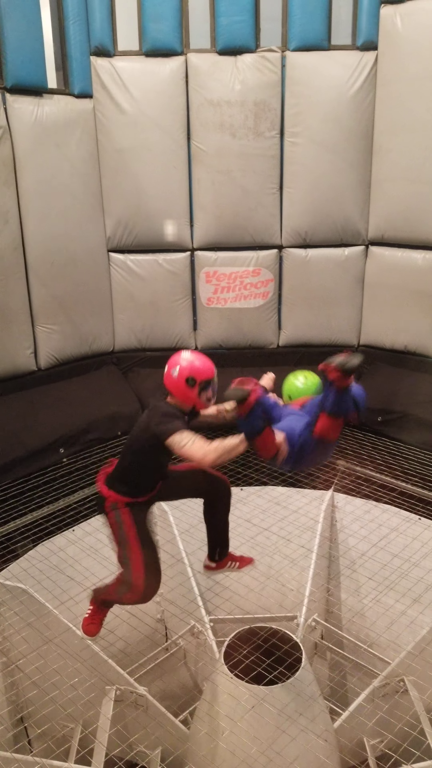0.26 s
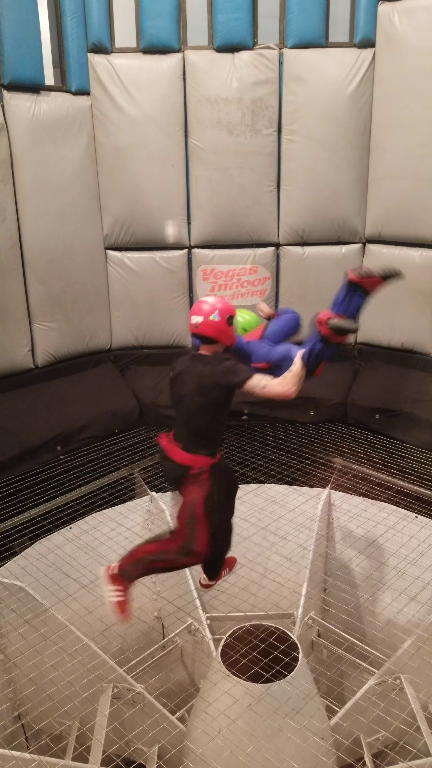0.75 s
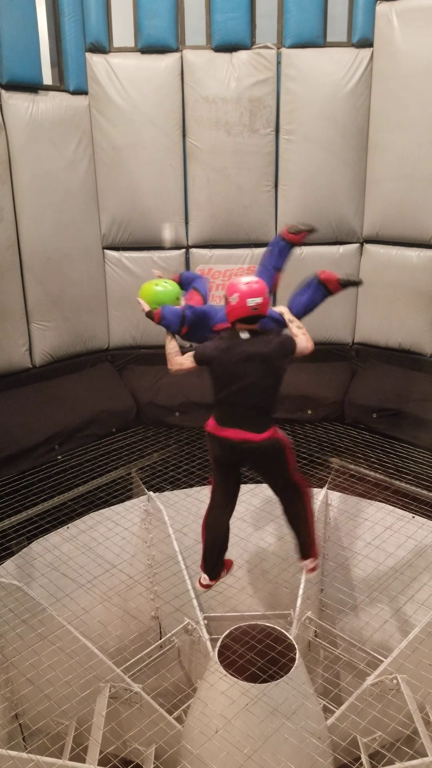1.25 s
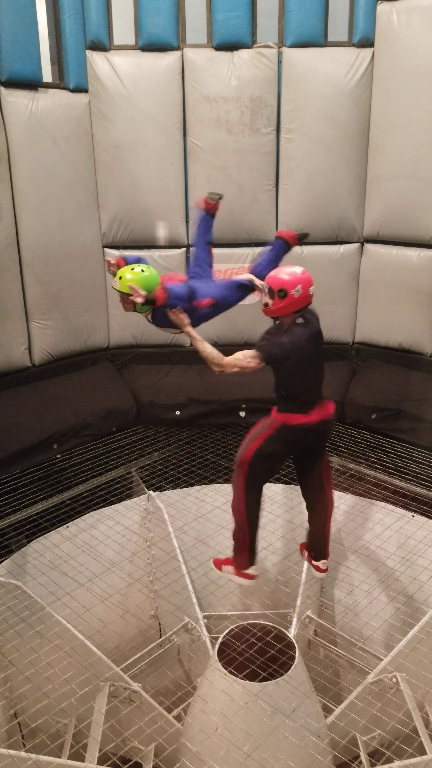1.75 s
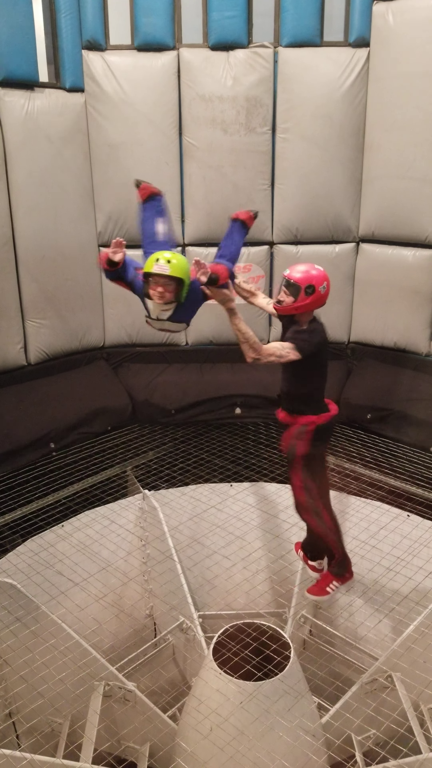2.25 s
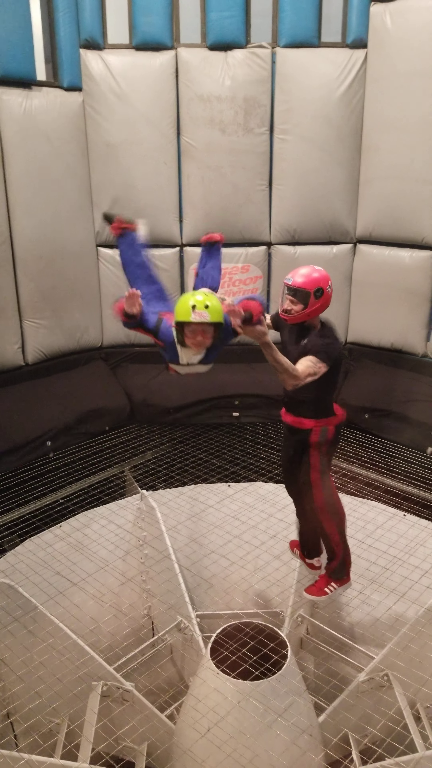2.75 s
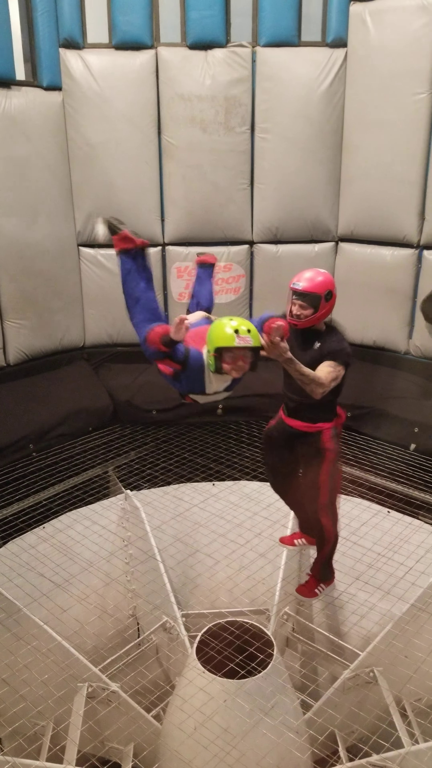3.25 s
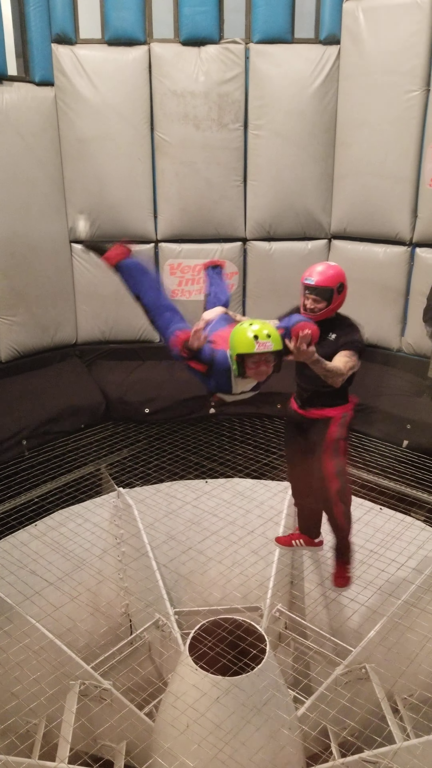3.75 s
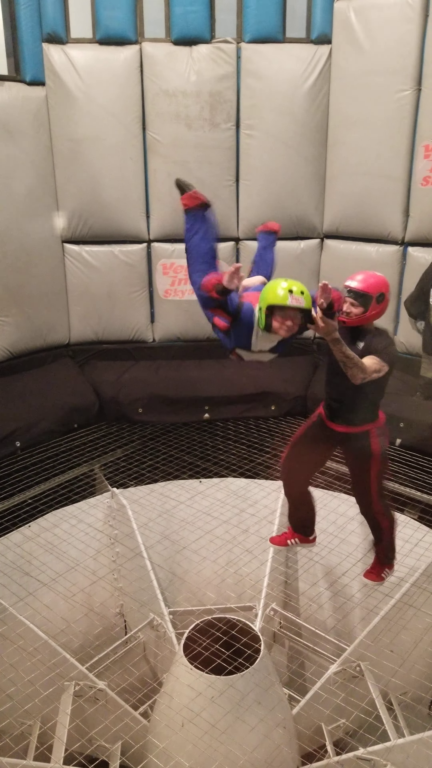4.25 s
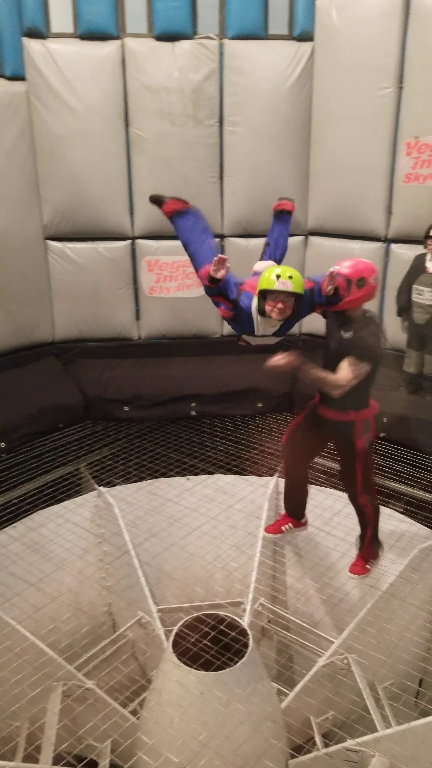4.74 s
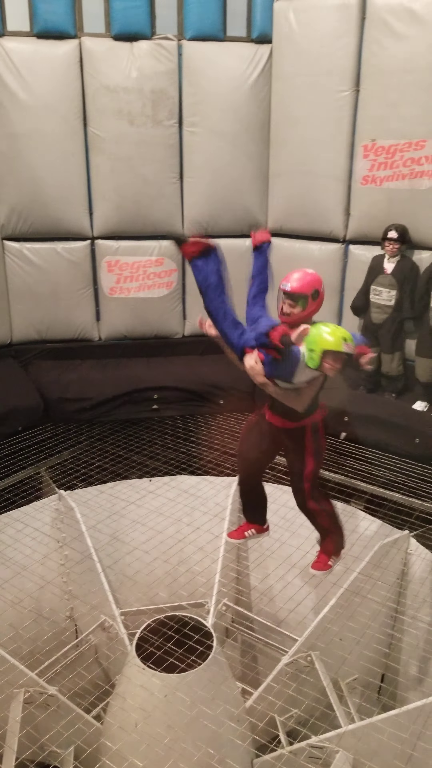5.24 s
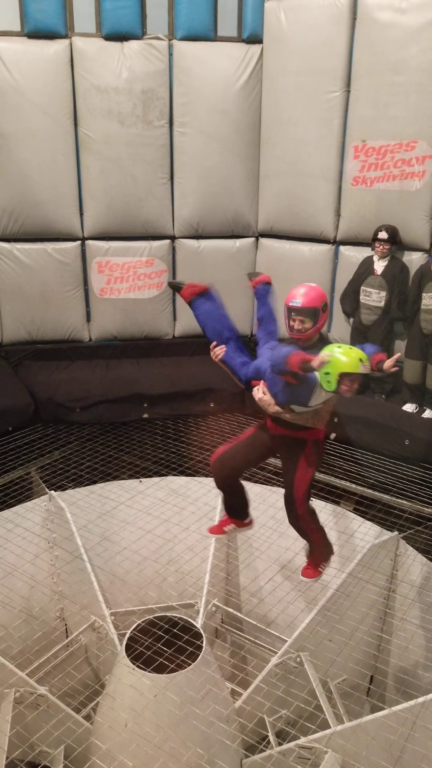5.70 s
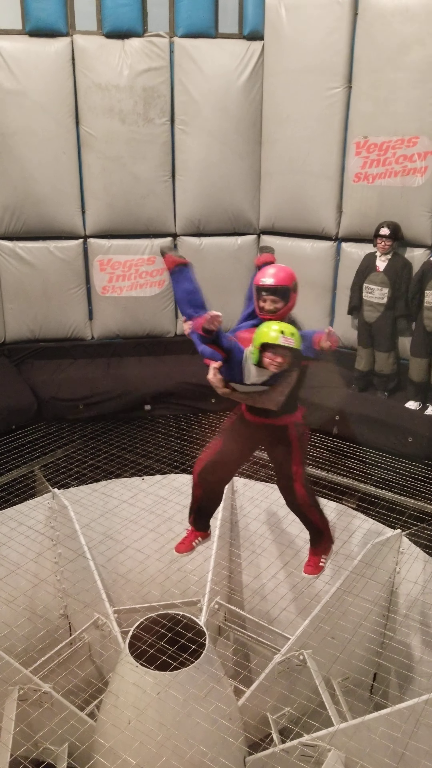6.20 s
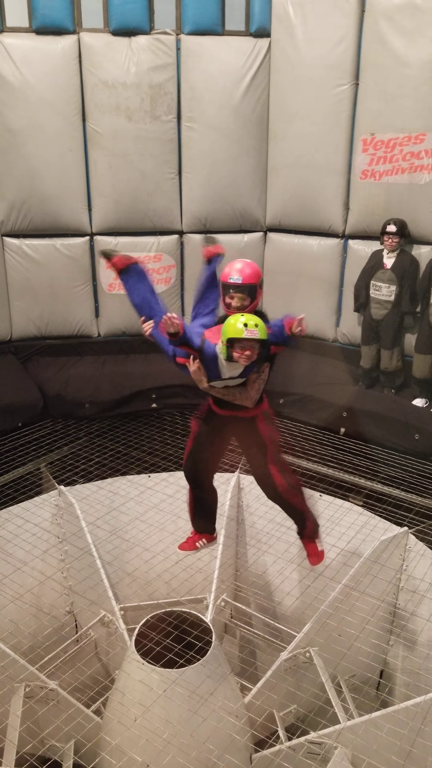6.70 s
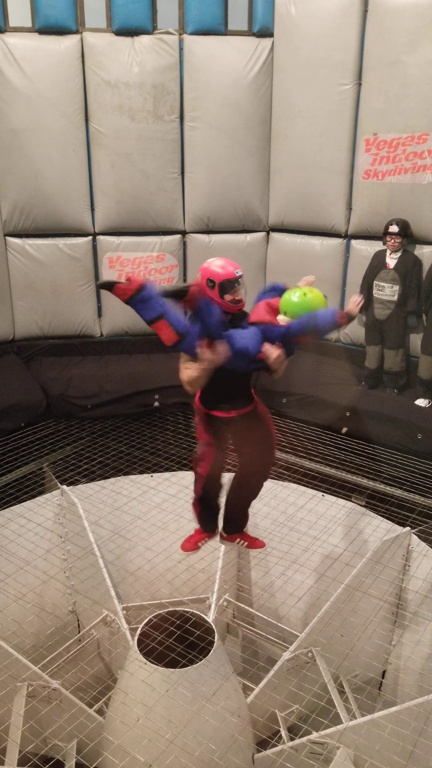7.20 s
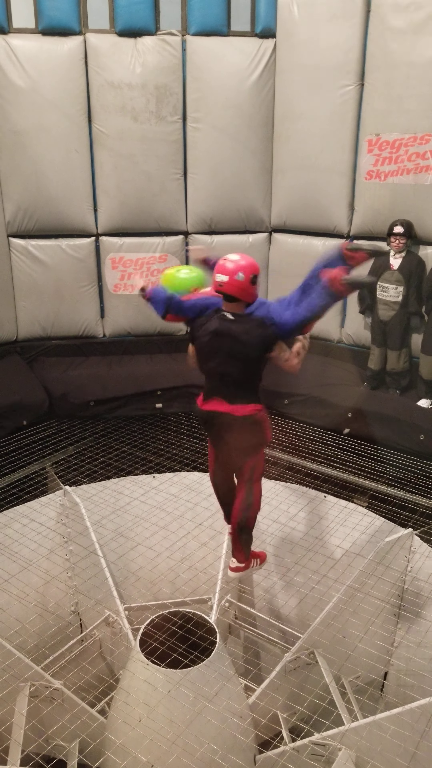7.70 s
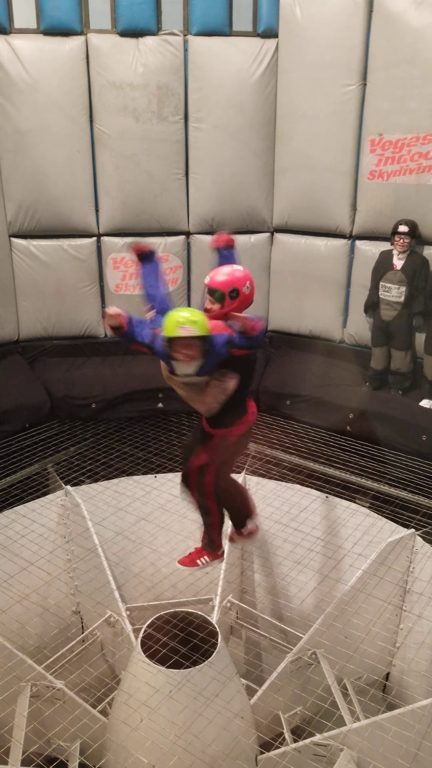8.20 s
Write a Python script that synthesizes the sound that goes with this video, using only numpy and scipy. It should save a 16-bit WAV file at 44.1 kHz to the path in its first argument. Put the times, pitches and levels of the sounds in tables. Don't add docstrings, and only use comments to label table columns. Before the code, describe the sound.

A constant, heavy fan drone fills a padded air shaft from beginning to end, already at full strength. Low steady harmonics dominate, fluttering slightly in their upper tones, over a broad airy roar and quieter mesh hiss. Around the middle the pitch drops by a barely noticeable amount and the hum eases while the airy whistle comes forward slightly. Heard through a viewing window in stereo, leaning left, with dense, pressed peaks.

```python
import sys
import numpy as np
from scipy import signal
from scipy.fft import rfft, irfft, next_fast_len
from scipy.io import wavfile

SR = 44100
rng = np.random.default_rng(int(sys.argv[2]) if len(sys.argv) > 2 else 0)


def inscribe(sig):
    pcm = np.round(np.clip(np.atleast_2d(sig).T, -1, 1) * 32767)
    wavfile.write(sys.argv[1], SR, pcm.astype(np.int16))


def voltage_ratio(decibels):
    exponent = np.asarray(decibels, float) / 20
    return 10 ** exponent


N = 373086


def rms_one(x):
    return x / np.sqrt(np.mean(np.abs(x) ** 2) + 1e-20)


def in_time(rows):
    s, *columns = np.transpose(rows)
    return [np.interp(np.arange(N) / SR, s, column) for column in columns]


def drift(rate_hz):
    step, run_in = 40, 4000
    r = np.exp(-2 * np.pi * rate_hz * step / SR)
    noise = rng.standard_normal(N // step + run_in + 2)
    slow = rms_one(signal.lfilter([1], [1, -2 * r, r * r], noise)[run_in:])
    return np.interp(np.arange(N) / step, np.arange(len(slow)), slow)


# (delay t/ms, gain)
REFLECTIONS = [
    [(.9, 0.11), (2.3, -0.0025), (4.1, 0.085), (7.3, 0.093)],
    [(1.3, 0.083), (2.9, 0.078), (5.2, -0.081), (6.4, 0.048)],
]


def turbulence(table, gust_db, patchy_db, direct):
    size = next_fast_len(N)
    hz = np.maximum(np.arange(size // 2 + 1) * SR / size, 1)
    at, *columns = np.transpose(table)
    left_db, right_db, alike = [np.interp(np.log(hz), np.log(at), column) for column in columns]
    alike = np.clip(alike + direct, -1, 1)
    octaves_beyond = np.maximum(np.log2(at[0] / hz), 0) + np.maximum(np.log2(hz / at[-1]), 0)
    colour = voltage_ratio(np.array([left_db, right_db]) - 30 * octaves_beyond)

    mid, side = rfft(rng.standard_normal((2, size))) * np.sqrt(SR / 4)
    common, opposed = mid * np.sqrt(1 + alike), side * np.sqrt(1 - alike)
    ports = np.array([common + opposed, common - opposed]) * colour
    if direct:
        ports = ports * [1 + sum(gain * np.exp(-2j * np.pi * hz * ms / 1000) for ms, gain in port)
                         for port in REFLECTIONS]

    octave = np.log2(np.clip(hz, at[0], at[-1]) / at[0])
    gust = 0.41 * drift(5.2) + drift(23)
    out = 0
    for k in range(int(octave[-1]) + 2):
        share = np.maximum(1 - np.abs(octave - k), 0)
        flicker_db = gust_db * gust + patchy_db * drift(6.8)
        out = out + irfft(ports * share, size)[:, :N] * voltage_ratio(flicker_db)
    return out


# (f/Hz, left level/dB per Hz, right level/dB per Hz, left-right likeness -1..1)
HISS_SPECTRUM = [(6030, -82.5, -93, -0.08), (6400, -87.5, -82, 0.13), (7120, -87.5, -98.5, -0.05),
                 (7940, -111, -99.5, 0.072), (9700, -94, -96.5, -0.26), (10800, -95, -93.5, 0.02),
                 (12000, -94.5, -97.5, -0.13), (13300, -94.5, -99, -0.07), (14000, -100.5, -99, 0.13),
                 (14900, -95.5, -101.7, -0.01), (15700, -95, -106.9, -0.12)]


def hiss(flow_db):
    return voltage_ratio(0.7 * flow_db) * turbulence(HISS_SPECTRUM, gust_db=0.8, patchy_db=0.9, direct=0.1)


# (f/Hz, left level/dB per Hz, right level/dB per Hz, left-right likeness -1..1)
RUSH_SPECTRUM = [(1050, -68.5, -69.5, -0.4), (1200, -64, -66.5, -0.19), (1350, -64.5, -62.5, -0.5),
                 (1540, -62, -62.5, -0.088), (1653, -65.5, -69, -0.17), (2360, -75, -73.5, -0.15),
                 (2760, -66.5, -78.5, 0.1), (3120, -71, -68.5, 0.22), (3390, -66, -66, 0.043),
                 (3650, -66.5, -70.5, 0.17), (4150, -66, -75, 0.15), (4600, -73, -79, -0.02),
                 (5230, -77.5, -86.5, 0.32)]


def mesh_rush(flow_db, turn):
    noise = turbulence(RUSH_SPECTRUM, gust_db=0.43, patchy_db=0.3, direct=0.092)
    return voltage_ratio(flow_db) * noise * (1 + 0.031 * np.cos(turn))


# (f/Hz, width f/Hz, left level/dB, right level/dB)
SHEDDING = [
    (1026, 76, -50, -53),
    (1495, 95, -54, -51),
    (3378, 200, -41.5, -44.5),
    (3644, 320, -46, -54.5),
    (11700, 700, -72, -77),
    (13900, 600, -69.5, -75.5),
]


def mesh_whistles(flow_db, wave_db, eased):
    out = 0
    for hz, width_hz, left_db, right_db in SHEDDING:
        r, w = np.exp(-np.pi * width_hz / SR), 2 * np.pi * hz / SR
        noise = rng.standard_normal((2, N))
        for _ in range(2):
            noise = signal.lfilter([1, 0, -1], [1, -2 * r * np.cos(w), r * r], noise)
        out = out + rms_one(noise) * voltage_ratio([[left_db], [right_db]]) * voltage_ratio(1.5 * drift(2.9))
    eased_db = 6 * (eased - 1.0)
    return voltage_ratio(1.2 * flow_db - 0.5 * wave_db + eased_db) * out


# (f/Hz, left level/dB per Hz, right level/dB per Hz, left-right likeness -1..1)
ROAR_SPECTRUM = [(20, -62.0, -65.1, 0.87), (35, -59.0, -62.4, 0.9), (54, -53.3, -57.4, 0.98),
                 (81, -50.0, -54.0, 0.94), (135, -48.5, -51.6, 0.93), (190, -44.6, -47.8, 0.98),
                 (244, -47.6, -49.6, 0.92), (298, -52.5, -52.4, 0.64), (352, -51.3, -58.9, 0.31),
                 (460, -51.5, -60.7, 0.75), (570, -54.4, -57.7, 0.44), (680, -55.5, -62.1, 0.15),
                 (790, -56.7, -64.7, -0.45), (950, -64.5, -67.7, 0.16)]


def roar(flow_db, wave_db, rumble_db, turn):
    noise = turbulence(ROAR_SPECTRUM, gust_db=-0.67, patchy_db=1.13, direct=0)
    noise = noise * (1 + 0.074 * np.cos(turn))
    rumble = signal.sosfiltfilt(signal.butter(2, 91, fs=SR, output="sos"), noise)
    return voltage_ratio(1.6 * flow_db - 0.15 * wave_db) * (noise - rumble) + voltage_ratio(rumble_db) * rumble


# (t/s, blade-passing f/Hz)
DRIVE_SPEED = [
    (0, 54.52),
    (4.05, 54.5),
    (4.35, 54.08),
    (8.46, 54.07),
]


def propeller():
    speed, = in_time(DRIVE_SPEED)
    turn = 2 * np.pi * np.cumsum(speed) / SR
    return turn, (speed.max() - speed) / np.ptp(speed)


# (t/s, wave level/dB, flow level/dB)
SHAFT_STATE = [(0.1, -9.5, -40), (0.35, -10.5, -40), (0.74, -9, -39), (1.72, -10, -38.5),
               (2.04, -9.5, -38.5), (3.13, -9.5, -38.5), (3.33, -10.5, -37.5), (3.75, -10.5, -39.5),
               (4.88, -13.5, -39.5), (6.3, -16.5, -37.5), (6.71, -13.5, -38), (7.13, -15.5, -37),
               (7.4, -13, -37.5), (7.52, -16, -37), (7.98, -13, -38.5), (8.31, -15, -37), (8.4, -14.5, -38)]


def shaft():
    return [level - np.mean(level) for level in in_time(SHAFT_STATE)]


DETUNING = {1: (0.1, 0.11, 0.37), 2: (-.6, -0.44, 1.0), 3: (-2.5, 1.5, -0.23), 4: (-3, -3.5, .1),
            5: (-2, -0.28, -0.48), 6: (-6.5, 2.2, -0.48)}
# (t/s, length t/s, harmonic, level/dB)
BODY_SHADOWS = [(6.55, 0.76, 5, 4), (0.82, 0.18, 3, -6), (0.25, .35, 3, -3.5), (2.11, 0.18, 3, -7),
                (3.145, .45, 3, 3), (4.156, 0.4, 3, 2.5), (4.394, 0.19, 3, -11), (4.85, 0.33, 3, 2.5),
                (6.054, 0.54, 3, -4), (0.30, .3, 4, 6.5), (1.347, 0.75, 4, 8.5), (2.20, .7, 4, -5.5),
                (2.88, 0.59, 4, 9), (3.61, 0.66, 4, 7.5), (4.147, 0.39, 4, 3.5), (4.698, 0.27, 4, 5.5),
                (5.80, .5, 4, -4.5), (6.20, 0.34, 4, 7.5), (7.148, 0.56, 4, 7.5), (8.12, 0.44, 4, 6.5),
                (1.05, 1.2, 5, -6.5), (1.95, 0.45, 5, 5.5), (3.18, 0.43, 5, 10.5), (4.20, .35, 5, 5.5),
                (4.622, .3, 5, 6), (5.244, 0.71, 5, -3.5), (7.853, .6, 5, 5), (4.00, 0.41, 6, 8),
                (6.25, .4, 6, -5.5), (7.903, .3, 6, -2.5)]


def swells(eased, wave_db):
    coarse = np.arange(0, N / SR + .02, .02)
    out = {}
    for k, (full_db, eased_db, share) in DETUNING.items():
        bumps = np.zeros(len(coarse))
        for s, length, harmonic, db in BODY_SHADOWS:
            if round(harmonic) == k:
                bumps += db * np.exp(-(2 * (coarse - s) / length) ** 2)
        steady_db = full_db + (eased_db - full_db) * eased + share * wave_db
        out[k] = steady_db + np.interp(np.arange(N) / SR, coarse, bumps)
    return out


# (harmonic, left level/dB, right level/dB, left lead/rad, left-right likeness 0..1)
BLADE_HARMONICS = [(1, -38.5, -42.8, 0.02, 1), (2, -9.6, -13.4, -0.09, 1.0), (3, -15.7, -19.3, 0.02, 1),
                   (4, -19.9, -20.9, 0.14, 0.96), (5, -26.9, -24.6, 0.11, 0.92),
                   (6, -22.7, -33.3, -1.3, 0.53), (7, -31.4, -43.3, 0.25, 0.68),
                   (8, -31.5, -37.9, -0.21, 0.73), (9, -38.0, -48.1, 0.38, 0.58),
                   (10, -37.9, -37.0, 0.7, 0.78), (11, -39.9, -39.9, 0.11, 0.44),
                   (12, -39.0, -45.4, 0.56, 0.94), (13, -38.0, -47.8, 2.62, 0.28),
                   (14, -47.0, -54.6, -2.57, 0.92), (15, -51.3, -57.0, -2.53, 0.77),
                   (16, -49.8, -55.4, -2.02, 0.21)]


def blade_tones(turn, swell_db, upper_db):
    path_share = {2: .005, 3: .03, 4: .04, 5: .04, 6: .03}
    eddy_share = {2: .025, 3: .08, 4: .14, 5: .2, 6: .03}
    out = np.zeros((2, N))
    for k, (_, left_db, right_db, lead, alike) in enumerate(BLADE_HARMONICS, 1):
        shared, own, fast = [drift(rate) + 1j * drift(rate) for rate in (1.6, 1.6, 6.0)]
        apart = 0.99 * np.sqrt(1 - alike ** 2) / alike
        slip = 0
        if k > 2:
            slip = rng.uniform(0, 2 * np.pi) + .6 * (k - 2) ** .5 * drift(.7)
        tone = np.sqrt(2) * voltage_ratio(swell_db.get(k, upper_db)) * np.exp(1j * (k * turn + slip))
        paths = 1 + path_share.get(k, .45) * shared + eddy_share.get(k, .75) * fast
        left = rms_one(paths) * voltage_ratio(left_db)
        right = rms_one(paths + apart * own) * voltage_ratio(right_db) * np.exp(-1j * lead)
        out += np.real(tone * np.array([left, right]))
    return out


def scene():
    turn, eased = propeller()
    wave_db, flow_db = shaft()
    swell_db = swells(eased, wave_db)
    background = hiss(flow_db) + mesh_rush(flow_db, turn) + mesh_whistles(flow_db, wave_db, eased)
    background = background + roar(flow_db, wave_db, swell_db[1], turn)
    return background + blade_tones(turn, swell_db, upper_db=1.5 * flow_db + 0.68)


def low_pass(x):
    return signal.sosfilt(signal.butter(12, 15800, fs=SR, output="sos"), x)


def record(dry):
    top, knee = 1.02, 8.0
    rounded = dry / (1 + np.abs(dry / top) ** knee) ** (1 / knee)
    return low_pass(rounded)


dry = scene()
out = record(dry)
inscribe(out)
```